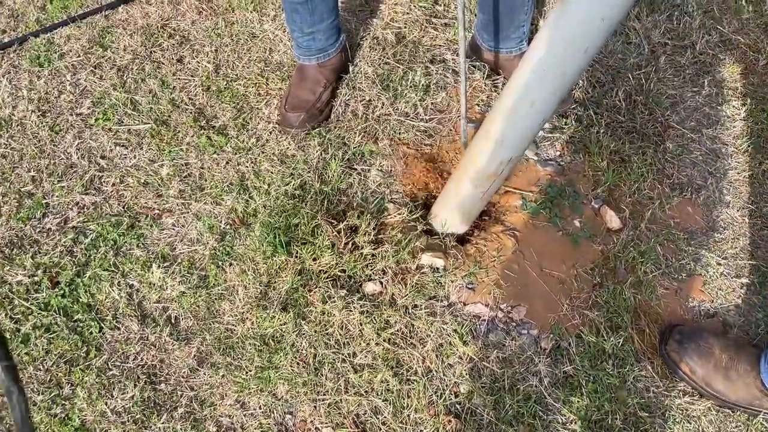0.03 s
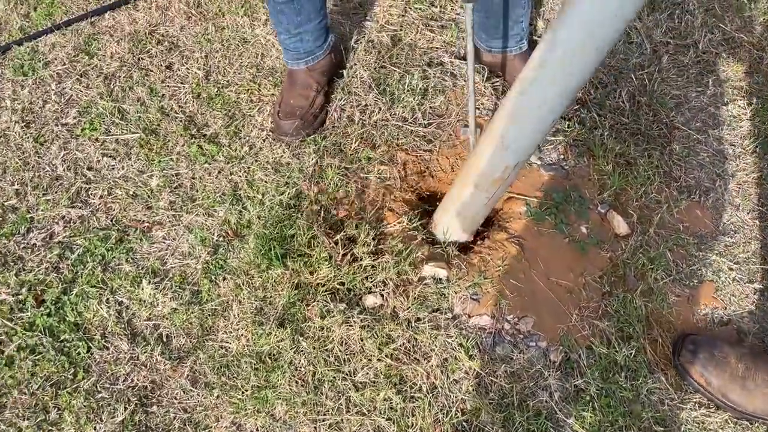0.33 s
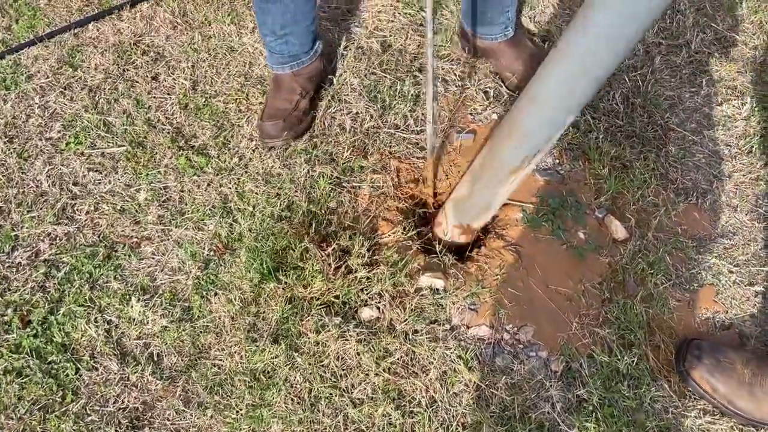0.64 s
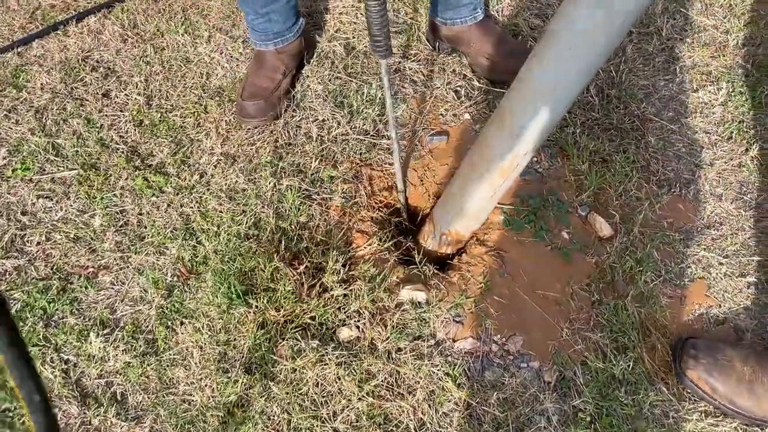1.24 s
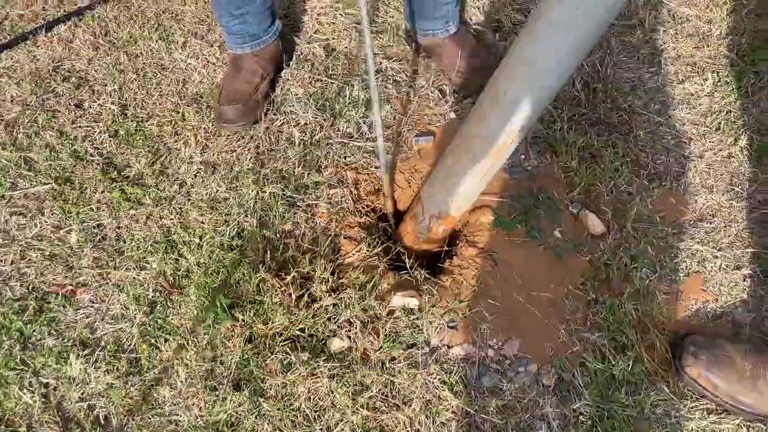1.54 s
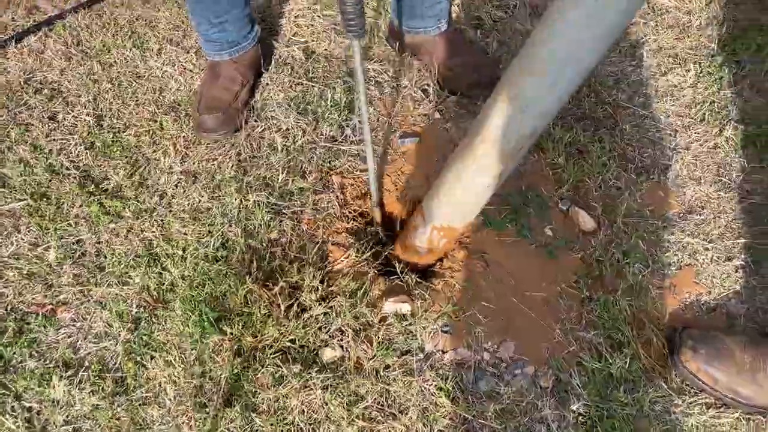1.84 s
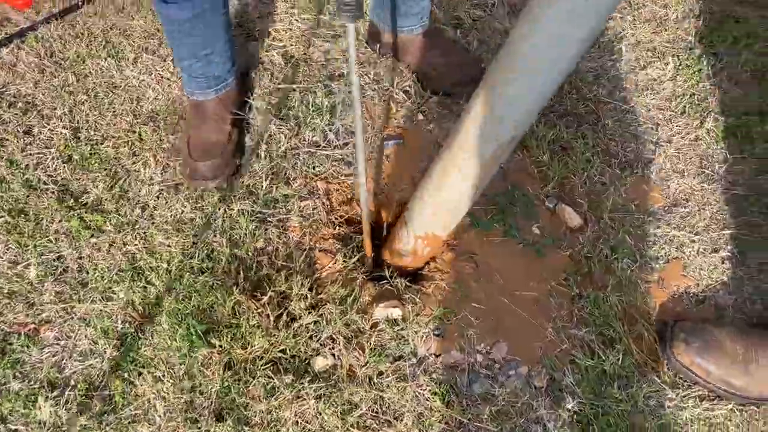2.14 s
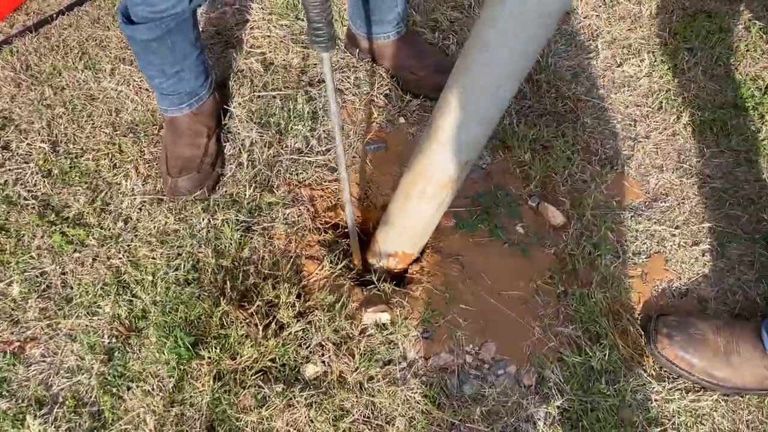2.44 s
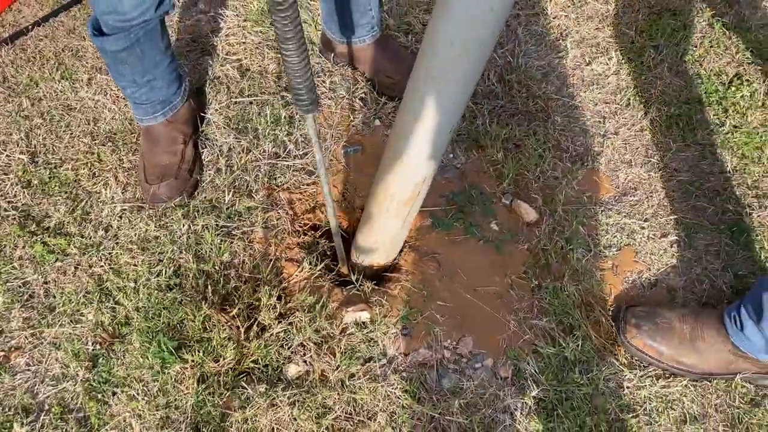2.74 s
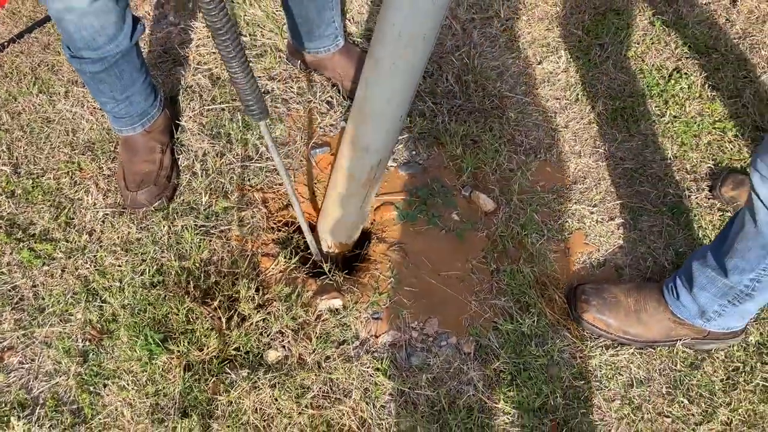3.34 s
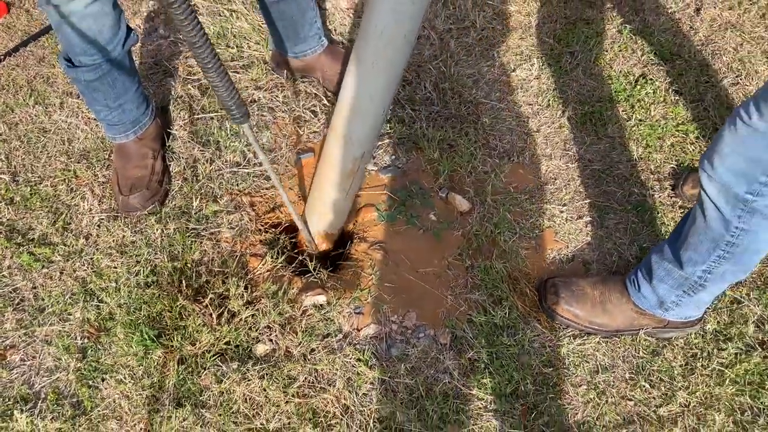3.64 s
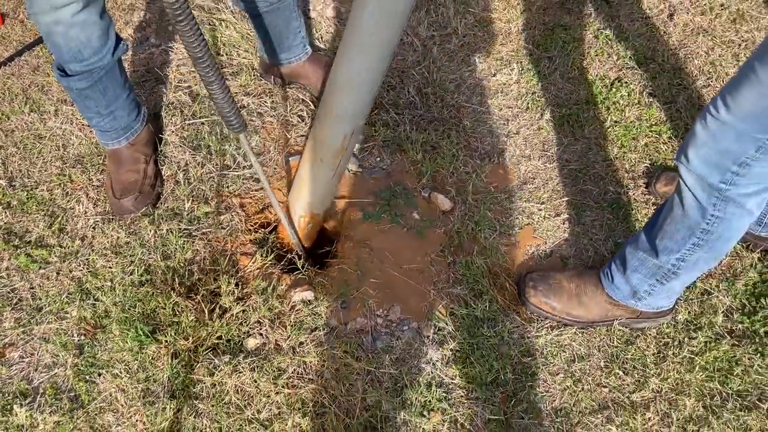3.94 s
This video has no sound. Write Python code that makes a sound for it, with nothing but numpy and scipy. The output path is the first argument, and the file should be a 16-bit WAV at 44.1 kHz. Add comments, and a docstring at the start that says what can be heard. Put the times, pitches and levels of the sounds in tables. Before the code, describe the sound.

A vacuum hose sucks mud from a small hole, slurping and gulping over a truck's steady engine and blower drone. A water jet hisses, grit ticks, and the mud lulls, then returns in spurts, heard close outdoors.

```python
"""A vacuum excavator digs a small muddy hole in a lawn, heard from just above at a hand-held camera.
From the start the truck's engine and blower drone, air rushes into the hose and a water lance hisses.
Mud churns, slurps, gulps and slaps as its bubbles resonate; the loudest splutter, near 0.65 s, makes
the gain control duck the whole sound. From 1 s grit ticks now and then on the nozzle. The mud and
spray fall into a lull, then return in spurts near 2 s and from about 3 s."""
import sys
import numpy as np
from scipy import signal
from scipy.fft import rfft, irfft, next_fast_len
from scipy.io import wavfile
from scipy.ndimage import uniform_filter1d, minimum_filter1d, map_coordinates

SR = 44100
rng = np.random.default_rng(int(sys.argv[2]) if len(sys.argv) > 2 else 0)


def generate_wav(sig):
    """Save sig (samples, or channels by samples) to the path in sys.argv[1] as 16-bit PCM at SR."""
    pcm = np.round(np.clip(np.atleast_2d(sig).T, -1, 1) * 32767).astype(np.int16)
    wavfile.write(sys.argv[1], SR, pcm)


N = 176400


def amp(db):
    """Decibels to amplitude ratio."""
    return 10 ** (np.asarray(db) / 20)


def unit(x):
    """Normalisation to rms 1."""
    return x / np.sqrt(np.mean(x ** 2) + 1e-20)


def along(points, hz):
    """Interpolation of (frequency [Hz], value) on a log axis."""
    freqs, values = np.transpose(points)
    return np.interp(np.log(hz + 1), np.log(freqs + 1), values)


def curve(rows):
    """Interpolation of (time [s], value) at every sample."""
    return np.interp(np.arange(N) / SR, *np.transpose(rows))


def wobble(knots_per_s):
    """Smooth random modulation."""
    return map_coordinates(rng.standard_normal(2048), [np.arange(N) * knots_per_s / SR + 2], mode="mirror")


def filtered(x, response):
    """Linear filtering by a complex frequency response."""
    size = next_fast_len(N + SR // 4)
    return irfft(rfft(x, size) * response(np.fft.rfftfreq(size, 1 / SR)), size)[..., :N]


def rush(spectrum, coherence, patchy_db):
    """Partly coherent stereo noise of rms 1, its gain patchy in time and frequency."""
    cells = signal.stft(rng.standard_normal((2, N)), nperseg=512)[2]
    patches = uniform_filter1d(rng.standard_normal(cells.shape[1:]), size=6, axis=0)
    patches = unit(uniform_filter1d(patches, size=6, axis=1))
    pair = signal.istft(cells * amp(patchy_db * patches), nperseg=512)[1][:, :N]
    angle = lambda hz: np.arccos(np.clip(along(coherence, hz), -1, 1)) / 2
    response = lambda hz: amp(along(spectrum, hz)) * [np.cos(angle(hz)), np.sin(angle(hz))]
    mid, side = filtered(pair, response)
    return unit(np.array([mid + side, mid - side]))


def tone(hz, drift, flutter_db):
    """A sinusoid of rms near 1 with random phase and amplitude modulation."""
    phase = 2 * np.pi * (hz * np.arange(N) / SR + rng.random()) + drift * wobble(5.03)
    return np.sqrt(2) * np.sin(phase) * amp(flutter_db * wobble(13))


def bubbles(start_s, hz, strength, cycles, rise, samples=600):
    """Bubble resonance: rising sinusoids that swell, then decay 60 dB in the given cycles."""
    k = np.arange(samples)
    turns = np.clip(hz, 150, 15000)[:, None] * k / SR
    age = np.minimum(turns / cycles, 2)
    envelope = (1 - np.exp(-10 * age)) * amp(-60 * age)
    wave = strength[:, None] * np.sin(2 * np.pi * turns * (1 + rise * age)) * envelope
    at = (np.abs(start_s) * SR).astype(int)[:, None] + k
    return np.bincount(at.ravel(), wave.ravel(), N)[:N]


def swarm(per_s, pitch_curve, spread, cycles, scatter_db, samples):
    """Superposition of random bubbles around (time [s], pitch [Hz]), at rms 1."""
    draws = np.random.default_rng(rng.integers(2 ** 31)).random((int(per_s * N / SR), 5))
    start_s = draws[:, 0] * N / SR
    detune = spread * np.sqrt(6) * (draws[:, 1] - draws[:, 2])
    hz = np.interp(start_s, *np.transpose(pitch_curve)) * np.exp(detune)
    strength = amp(-scatter_db * np.log(draws[:, 3] + 0.024)) * np.sign(draws[:, 4] - .5)
    return unit(bubbles(start_s, hz, strength, cycles, rise=0.17, samples=samples))


# The truck's weaker partials (frequency [Hz], relative level [dB])
TRUCK_PARTIALS = [(137, -35.5), (217.5, -34), (240.3, -35.5), (320, -39), (521, -45)]
# Exhaust rumble (frequency [Hz], relative spectral density [dB])
EXHAUST_SPECTRUM = [(20, -32), (70, 2), (130, 0.5), (230, -1), (500, -7.5), (800, -15.5), (2000, -52)]
# Slow swell of the whole drone (time [s], gain [dB])
TRUCK_GAIN = [(0, 0), (1.2, -1.5), (3.2, 1), (4, -2.5)]

def truck(engine_hz=79.75, blower_hz=411.5, left_lead_rad=0.54):
    """Periodic excitation: engine firing and blower give spectral lines over exhaust noise."""
    engine = amp(-21.5) * tone(engine_hz, drift=0.06, flutter_db=-3.0) * amp([[-.8], [.8]])
    note = amp(-21.5) * tone(blower_hz, drift=0.12, flutter_db=-0.5)
    phase_shift = np.exp(1j * left_lead_rad * np.array([[.5], [-.5]]))
    blower = filtered(note, lambda hz: phase_shift) * amp([[.4], [-.4]])
    partials = sum(amp(db) * tone(hz, drift=0.46, flutter_db=2.0) for hz, db in TRUCK_PARTIALS)
    rumble = amp(-27) * rush(EXHAUST_SPECTRUM, [(30, 0.14), (100, 0.89), (500, 0.63)], patchy_db=2.67)
    return amp(curve(TRUCK_GAIN)) * (engine + blower + partials + rumble)


# Intake air noise (frequency [Hz], relative spectral density [dB])
SUCTION_SPECTRUM = [(200, 3.5), (600, 2.5), (2000, -3), (3300, -7.5), (3900, -13.5), (6500, -20),
                    (9500, -18), (13800, -35)]
# Its likeness in left and right (frequency [Hz], coherence [-1..1])
SUCTION_COHERENCE = [(600, 0.62), (1250, 0), (2400, 0.34), (14000, 1)]

def hose():
    """Flow noise: air rushes steadily into the nozzle."""
    return amp(-31.5) * rush(SUCTION_SPECTRUM, SUCTION_COHERENCE, patchy_db=1.5)


# Hiss of the mist (frequency [Hz], relative spectral density [dB])
MIST_SPECTRUM = [(600, -4.5), (3200, 7.5), (4200, -1.5), (6500, -2), (9200, 3.5), (11500, 2), (14000, 3),
                 (16000, -3.5)]
# How much of the jet sprays in the open (time [s], gain [dB])
SPRAY_GAIN = [(0, -33.5), (0.19, -25.5), (0.35, -31), (0.62, -27), (0.78, -40.5), (1.25, -47),
              (2.03, -41.5), (2.07, -31), (2.15, -30.5), (2.22, -43), (2.5, -42.5), (2.7, -33),
              (2.96, -28.5), (3.44, -35.5), (3.52, -29), (3.62, -33), (3.72, -44)]

def lance(drop_hz=5900):
    """Atomisation: the water jet breaks into hissing mist and pattering droplets."""
    flicker = amp(3 + 1.67 * wobble(120))
    mist = flicker * rush(MIST_SPECTRUM, [(4500, 0.44), (10000, 1.0)], patchy_db=1.5)
    drops = swarm(per_s=3100, pitch_curve=[(0, drop_hz)], spread=0.43, cycles=3.7,
                  scatter_db=6.5, samples=100)
    return amp(curve(SPRAY_GAIN)) * (mist + amp(-5.5) * drops)


def hole(x, cutoff_hz=710):
    """High-pass radiation: the small hole emits little below its own note."""
    return filtered(x, lambda hz: 1 / (1 + (cutoff_hz / (hz + 1)) ** 8))


# Wash of mud (frequency [Hz], relative spectral density [dB])
WASH_SPECTRUM = [(60, -6), (230, 0.5), (640, 2.5), (950, -1), (1800, -5), (3200, -4.5), (4000, -10.5),
                 (15000, -56)]
# Bubbles get finer as the mud thins (time [s], typical pitch [Hz])
BUBBLE_PITCH = [(.65, 1136), (3.6, 1810)]
# How hard the slurry churns (time [s], gain [dB])
CHURN_GAIN = [(0, -21), (0.22, -17.5), (0.35, -24.5), (0.5, -23.5), (0.63, -14), (0.8, -29.5), (1.35, -51),
              (1.6, -39), (1.98, -39.5), (2.08, -23.5), (2.28, -30), (2.38, -36), (3.2, -22.5), (3.35, -31),
              (3.6, -25.5), (3.7, -29.5), (4, -46)]

def slurry():
    """Two-phase flow: mud and air tear up at the nozzle into bubbles and a sputtering wash."""
    sputter = amp(3.1 * wobble(150))
    wash = unit(sputter * rush(WASH_SPECTRUM, [(300, 0.92), (3000, 1.0)], patchy_db=4.0))
    pops = swarm(per_s=700, pitch_curve=BUBBLE_PITCH, spread=0.434, cycles=9.8,
                 scatter_db=2.0, samples=800)
    return amp(curve(CHURN_GAIN) - 3.5 + 1.7 * wobble(35)) * (wash + hole(pops))


# Slurps (start [s], duration [s], level [dB], first pitch [Hz], last pitch [Hz])
SLURP_GLIDES = [(0, 0.31, -23, 1650, 885), (0.577, 0.073, -17, 1310, 1030), (0.65, 0.12, -24.5, 745, 470),
                (1.547, .09, -33.5, 990, 760), (2.209, 0.11, -32, 2250, 1240),
                (2.957, .12, -26, 2060, 1150)]

def slurps():
    """Gliding resonance: bubbles crowd round a note that falls as the nozzle's air gap opens."""
    out, t = np.zeros(N), np.arange(N) / SR
    for start, length, db, first_hz, last_hz in SLURP_GLIDES:
        swell = np.sqrt(np.abs(np.sin(np.pi * np.clip((t - start) / length, 0, 1))))
        glide = [(start, first_hz), (start + length, last_hz)]
        stream = swarm(per_s=450, pitch_curve=glide, spread=0.078, cycles=11.6,
                       scatter_db=1.5, samples=1000)
        out += amp(db) * swell * stream
    return out


# Big air pockets collapsing (time [s], relative level [dB], pitch [Hz])
AIR_POCKETS = [(.208, -19, 300), (.292, -8, 320), (2.111, -19, 357), (3.155, -5, 290), (3.197, -17, 298),
               (3.570, -11, 420)]

def gulps(cycles=8.1, rise=0.33, splat_t60_s=0.029):
    """Damped oscillation: a collapsing air pocket rings low and briefly, with a dull splat."""
    out, t = np.zeros(N + SR), np.arange(SR // 10) / SR
    for start, db, hz in AIR_POCKETS:
        age = hz * t / cycles
        envelope = (1 - np.exp(-10 * age)) * amp(-60 * age)
        bubble = 2 * np.sin(2 * np.pi * hz * t * (1 + rise * age)) * envelope
        band = signal.butter(2, [hz / 2, 2 * hz], "band", fs=SR, output="sos")
        splat = amp(-6 - 60 * t / splat_t60_s) * unit(signal.sosfilt(band, rng.standard_normal(len(t))))
        out[round(start * SR):][:len(t)] += amp(db) * (bubble + splat)
    return out[:N]


# Mud slapping into the hose; a narrow spread plops, a wide one splats
# (time [s], relative level [dB], pitch [Hz], pitch spread [natural log ratio])
MUD_SLUGS = [(0.223, -10.5, 1590, 0.34), (0.235, -9, 1140, 0.35), (0.6, -2.5, 1160, 0.35),
             (.620, -7, 970, .4), (0.648, 4, 1070, 0.42), (0.662, -10, 1090, .2), (.704, -8, 1370, 0.43),
             (0.727, -7.5, 1850, 0.53), (0.831, -8, 1963, 0.51), (1.026, -14.5, 1170, 0.27),
             (1.148, -15, 1960, 0.49), (1.178, -11, 1430, 0.51), (2.054, -5.5, 2080, 0.44),
             (2.087, -4.5, 3050, 0.13), (3.003, -11, 1600, 0.23), (3.057, -9.5, 1560, 0.33),
             (3.278, -8.5, 1250, 0.47), (3.383, -12, 2100, .45), (3.616, -7.5, 2740, 0.092),
             (3.671, -6.5, 1400, 0.39), (3.678, -9.5, 910, 0.18), (3.731, -6.5, 1010, 0.32),
             (3.771, -8, 2180, 0.45)]

def slugs(count=10, trail_s=.005):
    """Impulsive excitation: each slug rings one main bubble and a quick trail of weaker ones."""
    out = np.zeros(N)
    for start, db, hz, spread in MUD_SLUGS:
        late, detune = rng.standard_normal((2, count))
        strength = .5 * rng.choice([-1, 1], count)
        late[0], detune[0], strength[0] = 0, 0, 1.5  # the main bubble
        onsets = start + trail_s * np.abs(late)
        pitches = hz * np.exp(spread * detune)
        out += amp(db + 3.5) * bubbles(onsets, pitches, strength, cycles=9.6, rise=0.037)
    return hole(out)


# Stones striking the nozzle (time [s], relative level [dB])
GRIT_IMPACTS = [(1.047, -29.5), (2.055, -17.5), (2.09, -25), (3.058, -20), (3.384, -19), (3.531, -21.5),
                (3.769, -25), (3.783, -18)]

def grit(nozzle_hz=3286, ring_t60_s=0.025, crack_t60_s=0.02):
    """Impact and free vibration: each stone cracks against the nozzle, which rings briefly."""
    out, t = np.zeros(N + SR), np.arange(SR // 20) / SR
    ring = .5 * amp(1 - 60 * t / ring_t60_s) * np.sin(2 * np.pi * nozzle_hz * t)
    for start, db in GRIT_IMPACTS:
        crack = amp(-60 * t / crack_t60_s) * rng.standard_normal(len(t))
        out[round(start * SR):][:len(t)] += amp(db - 2.5) * (crack + ring)
    return filtered(out[:N], lambda hz: amp(along([(1000, 6), (4000, 12.5), (15000, 1.0)], hz)))


def ground(x, t60_s=0.063):
    """Scattering: the ground and the workers' legs return a faint, brief tail."""
    t = np.arange(SR // 16) / SR
    tail = rng.standard_normal((2, len(t))) * amp(-60 * t / t60_s) * (t > .002)
    return amp(-8) * signal.fftconvolve(x[None], tail / np.linalg.norm(tail[0]), axes=1)[:, :N]


# Phase between the microphones (frequency [Hz], left lead [rad])
MIC_PHASE = [(2000, 0), (3600, 1.53), (6000, 1), (8300, -3.5), (11000, -4.5), (13300, -6)]
# Balance between them (frequency [Hz], left minus right [dB])
MIC_BALANCE = [(3300, 1), (5300, 5), (8000, 0)]

def camera_body(x):
    """Diffraction: the camera body shifts phase and level between its two microphones."""
    side = np.array([[.5], [-.5]])
    phase_shift = lambda hz: np.exp(1j * side * along(MIC_PHASE, hz))
    return filtered(x, lambda hz: phase_shift(hz) * amp(side * along(MIC_BALANCE, hz)))


def scene():
    """Superposition: the hole lies just below the camera; the truck stands farther off."""
    mud = slurry() + slurps() + slugs() + gulps()
    return truck() + camera_body(mud + ground(mud.mean(axis=0)) + grit() + lance() + hose())


def record(dry, threshold_db=-12, hold_s=0.17, release_s=0.088, low_hz=20, top_hz=15900):
    """Automatic gain control ducks on loud bursts, holds and recovers; band limiting follows."""
    power = np.abs(uniform_filter1d(np.mean(dry ** 2, axis=0), size=600))
    excess_db = np.maximum(10 * np.log10(power + 1e-12) - threshold_db, 1e-6)
    window = 2 * int(hold_s * SR / 2) + 1
    held_db = -minimum_filter1d(-excess_db, window, origin=window // 2)
    decay = np.arange(N) / SR / release_s
    duck_db = np.exp(np.maximum.accumulate(np.log(held_db) + decay) - decay)  # exponential release
    ducked = dry * amp(-uniform_filter1d(duck_db, size=300))
    return filtered(ducked, lambda hz: (hz < top_hz) * hz ** 2 / (hz ** 2 + low_hz ** 2))


dry = scene()
out = record(dry)
generate_wav(out)
```